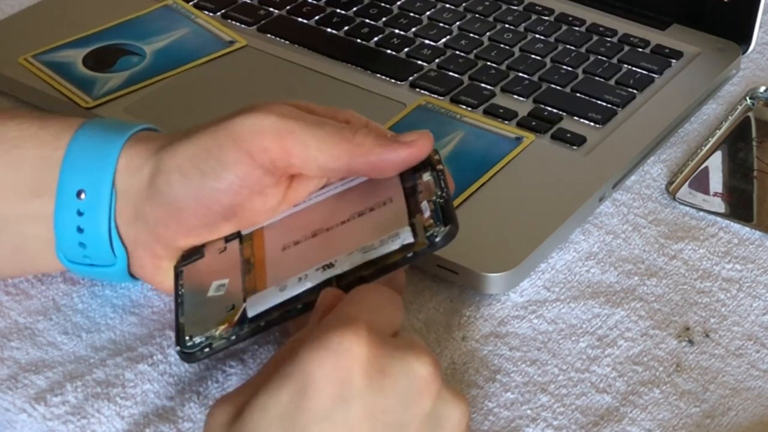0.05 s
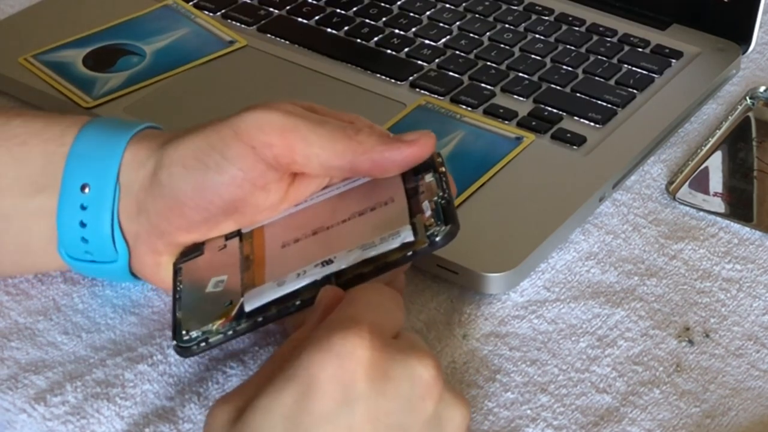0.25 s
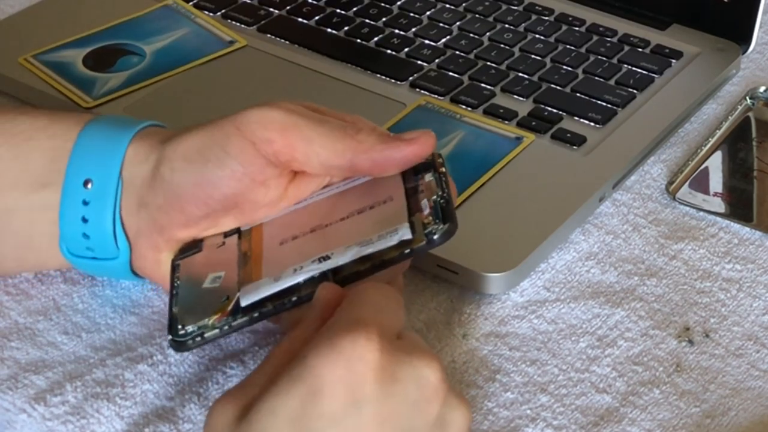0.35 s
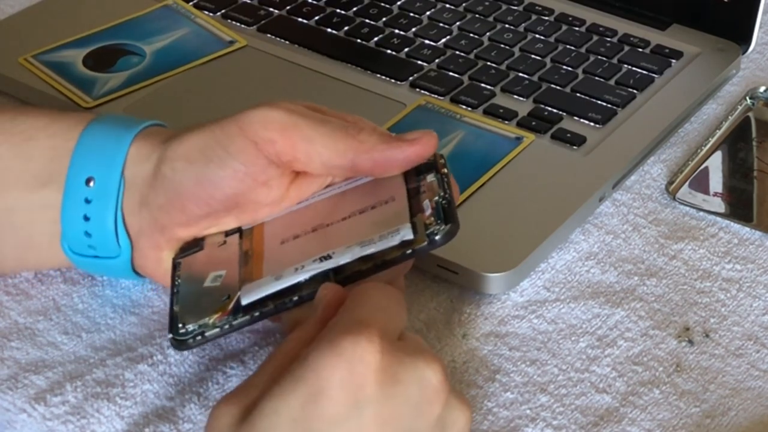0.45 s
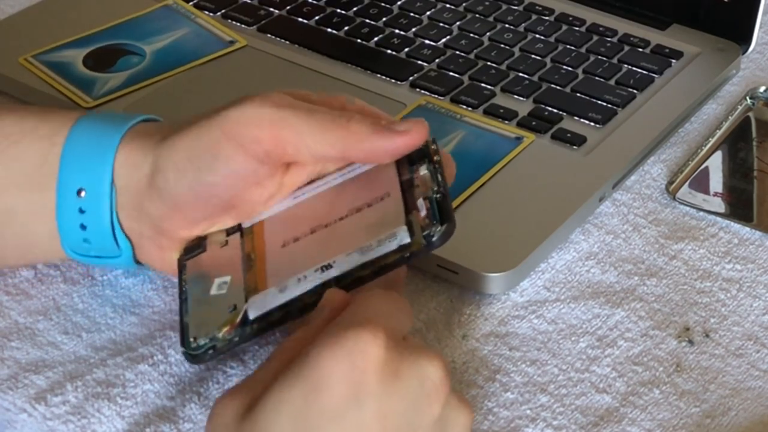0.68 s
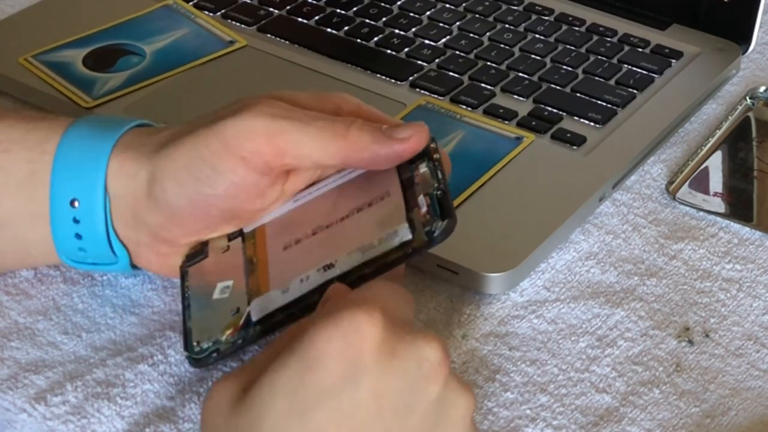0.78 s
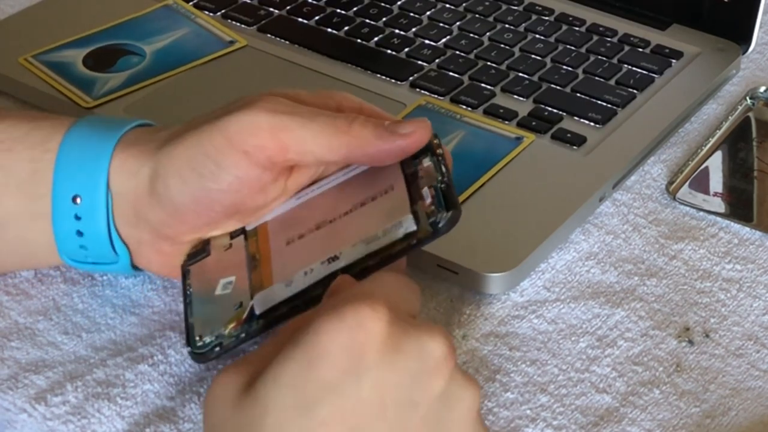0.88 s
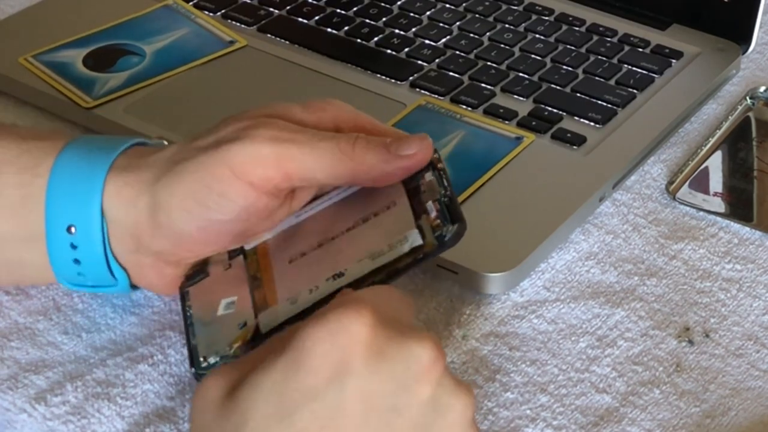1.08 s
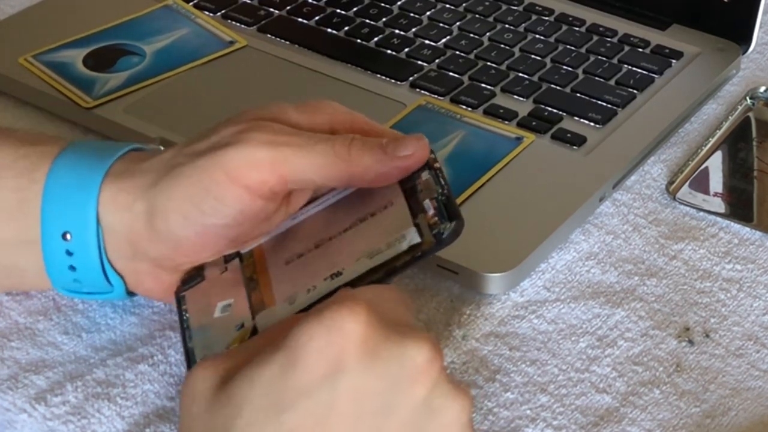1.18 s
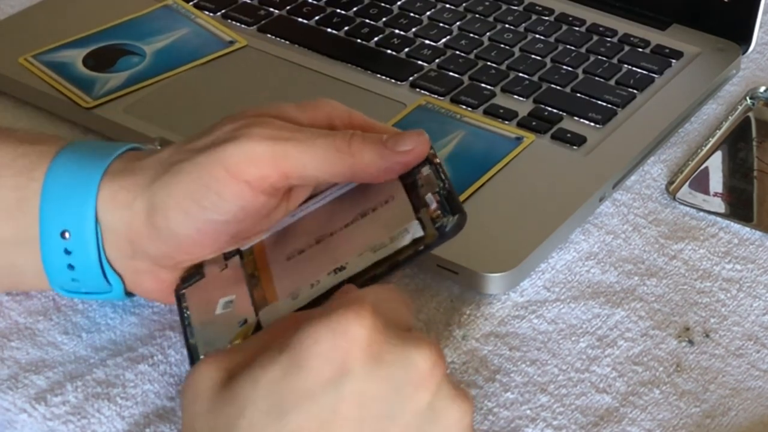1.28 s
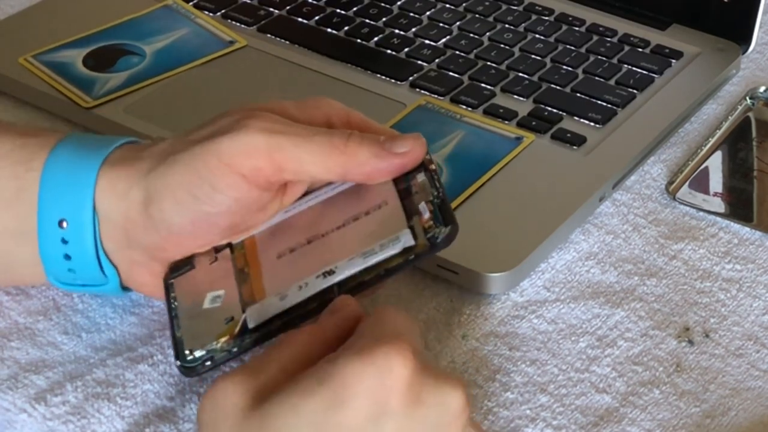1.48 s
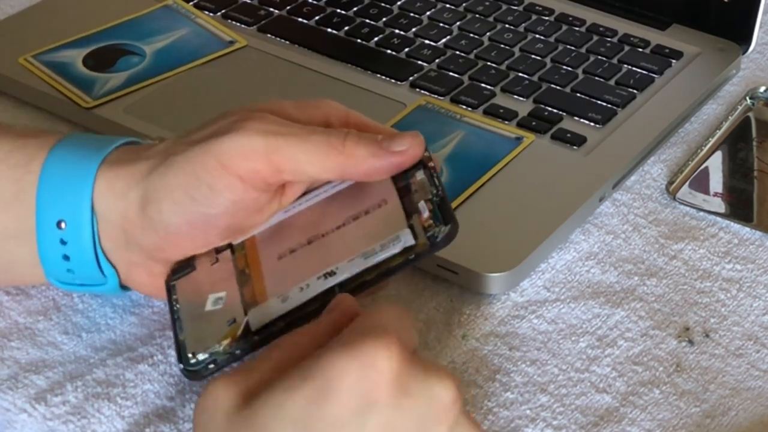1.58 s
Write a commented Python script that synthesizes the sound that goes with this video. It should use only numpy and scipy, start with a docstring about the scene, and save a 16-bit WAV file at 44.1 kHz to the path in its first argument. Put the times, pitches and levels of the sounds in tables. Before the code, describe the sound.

Sharp plastic cracks from an opened phone-like device, then faint ticks and soft rubbing indoors

```python
"""Prying open a small device

Fingers pry at a small open electronic device on a towel in a quiet room. Adhesive and clips let go in two
loud snaps and some faint ticks: bright bursts with a noisy shiver that set damped case modes ringing.
Sparse, decaying reflections answer as the room. Shaped noise makes the rubbing of skin and cloth and the
steady hiss; wavering sine lines make the mains hum.
"""
import sys
import numpy as np
from scipy import signal
from scipy.fft import rfft, irfft
from scipy.io import wavfile
from scipy.ndimage import uniform_filter1d

SR = 44100
rng = np.random.default_rng(int(sys.argv[2]) if len(sys.argv) > 2 else 0)


def invert_db(x):
    """Field ratio 10**(x/20) for x, a level in decibels (scalar or array-like)."""
    u = np.asarray(x, float) / 20
    return 10 ** u


def int16_out(signal):
    """Quantize to a 16-bit WAV file."""
    q = np.round(np.clip(np.atleast_2d(signal).T, -1, 1) * 32767)
    wavfile.write(sys.argv[1], SR, q.astype(np.int16))


N = 72765  # samples, 1.65 s


def evened(x):
    """Scales a signal to an rms of one."""
    return x / np.sqrt(np.mean(x ** 2) + 1e-20)


def read(points, hz):
    """Reads a (frequency, value) curve along a logarithmic frequency axis."""
    f, value = np.transpose(points)
    return np.interp(np.log(hz + 1), np.log(f + 1), value)


def add(mix, start_s, sound):
    """Lays a sound into the mix in place, cut off at the end of the mix."""
    part = mix[round(start_s * SR):][:len(sound)]
    part += sound[:len(part)]


def noise(tone, patchy_db, size):
    """Noise of a given colour from random short-time spectra whose level drifts in patches; rms one."""
    frames = 4 * N // size + 5
    hz = np.fft.rfftfreq(size, 1 / SR)
    real, imag, patches = rng.standard_normal((3, len(hz), frames))
    patches = uniform_filter1d(patches, size=12, axis=0)  # smooth across frequency
    patches = evened(uniform_filter1d(patches, size=10, axis=1))  # and across time
    level_db = read(tone, hz)[:, None] + patchy_db * patches
    spectra = (real + 1j * imag) * invert_db(level_db)
    sound = signal.istft(spectra, nperseg=size, noverlap=3 * size // 4)[1]
    return evened(sound[:N])


def hiss():
    """Steady background air: coloured noise, strongest in the lows, with a long faint treble."""
    # colour of the background: (frequency [Hz], relative level [dB])
    air_tone = [(12, -43.5), (30, -25.5), (50, -6.5), (70, -2), (100, -6.5), (169, -11.5), (260, -11),
                (330, -12), (709, -20.5), (1390, -26), (5000, -31.5), (11500, -34.5), (15700, -33),
                (16000, -55.5)]
    return invert_db(-67) * noise(air_tone, patchy_db=1.52, size=4096)


def slow_waver(t):
    """Slow random drift: sines from 0.5 to 9 Hz at random phases, weaker as they get faster; rms one."""
    rates_hz = np.geomspace(.5, 9, num=20)
    return evened(sum(np.sin(2 * np.pi * (f * t + rng.random())) / np.sqrt(f) for f in rates_hz))


def hum():
    """Mains lines: sines whose level and phase waver."""
    # hum lines: (frequency [Hz], level before the waver [dB rms])
    lines = [(59.2, -70), (118.4, -67.5), (242.2, -79), (274.5, -82)]
    level_waver_db, phase_waver_rad = 0.5, .4  # rms
    t = np.arange(N) / SR
    out = np.zeros(N)
    for hz, db in lines:
        level = np.sqrt(2) * invert_db(db + level_waver_db * slow_waver(t))
        phase = 2 * np.pi * (hz * t + rng.random()) + phase_waver_rad * slow_waver(t)
        out += level * np.sin(phase)
    return out


def room(x):
    """Sparse reflections after the first wall, each band dying at its own speed."""
    # decay of the room: (frequency [Hz], time to fall 60 dB [s])
    decay = [(500, 0.46), (1400, .36), (3500, .35), (9000, .32), (15000, .24)]
    # colour of the reflections: (frequency [Hz], relative level [dB])
    room_tone = [(500, 1.5), (1400, 1.4), (2500, 3), (3800, -2), (5500, 2.5), (9000, -2.1), (15000, -2)]
    room_db, wall_s, build_s = -11, 0.0053, .002  # level, delay of the first wall, build-up time
    taps = np.zeros(SR // 2)
    slots = np.arange(0, len(taps) - 12, 12)
    # one reflection of random sign somewhere in every 12 samples
    taps[slots + rng.integers(0, 12, len(slots))] = rng.choice([-1., 1.], len(slots))
    hz, t, spectra = signal.stft(taps, SR, nperseg=256)
    level_db = read(room_tone, hz)[:, None] - 60 * t / read(decay, hz)[:, None]
    tail = signal.istft(spectra * invert_db(level_db), SR, nperseg=256)[1]
    after_wall_s = np.maximum(np.arange(len(tail)) / SR - wall_s, 0)
    tail = tail * (1 - np.exp(-after_wall_s / build_s))
    return invert_db(room_db) * signal.fftconvolve(x, tail / np.linalg.norm(tail))[:N]


def rubbing():
    """Skin and cloth rubbing: soft friction noise that follows the hands."""
    # strength of the rubbing: (time [s], level [dB])
    strokes = [(0, -97), (.1, -85), (.19, -71), (.4, -97), (0.432, -63.5), (.66, -72.5), (0.719, -70.5),
               (.76, -68.5), (.79, -69.5), (.82, -93.5), (1.04, -92), (1.08, -76), (1.149, -92),
               (1.27, -74), (1.35, -91), (1.541, -86.5), (1.579, -72.5), (1.65, -80.5)]
    # colour of the friction: (frequency [Hz], relative level [dB])
    rub_tone = [(350, -31), (800, -11), (1570, -2.5), (3000, -6.5), (5070, -5.5), (8160, -12.5),
                (15500, -15.5), (16000, -35)]
    s, db = np.transpose(strokes)
    envelope = invert_db(np.interp(np.arange(N) / SR, s, db))
    return envelope * noise(rub_tone, patchy_db=2.0, size=256)


def ring(modes, rise_s, t):
    """Heavily damped modes with a soft start."""
    soft_start = (1 - np.exp(-t / rise_s)) ** 2
    return soft_start * sum(invert_db(db - 60 * t / t60) * np.sin(2 * np.pi * hz * t) for hz, db, t60 in modes)


def crack(centre_hz, grit):
    """A part letting go: a burst of a few bright cycles, then a noisy shiver around the same pitch."""
    half_s = .85 / centre_hz  # half-length of the burst: 0.85 cycles
    shiver_db, shiver_t60_s, shiver_spread = -21, 0.02, .55  # spread as a share of the centre
    t = np.arange(len(grit)) / SR
    burst = np.exp(-(t / half_s - 2) ** 2) * np.cos(2 * np.pi * centre_hz * (t - 2 * half_s))
    hz = np.fft.rfftfreq(len(grit), 1 / SR)
    band = np.exp(-((hz / centre_hz - 1) / shiver_spread) ** 2)
    shiver = evened(irfft(rfft(grit) * band, len(grit)))
    shiver_level = invert_db(shiver_db - 60 * t / shiver_t60_s) * (1 - np.exp(-t / half_s))
    return burst + shiver * shiver_level


def click(crack_db, crack_hz, hollow_db, panel_db, grit):
    """One release: the crack sets the hollow case and its thin panel ringing."""
    # modes of the hollow case: (frequency [Hz], relative level [dB], time to fall 60 dB [s])
    hollow_modes = [(500, -22.5, 0.0074), (941, -12, .007), (1350, -5.5, 0.0079), (1696, -7, 0.0073),
                    (2500, -14, .005)]
    # modes of the thin panel: (frequency [Hz], relative level [dB], time to fall 60 dB [s])
    panel_modes = [(3907, -2, .0032), (5200, -7.5, 0.0033)]
    hollow_rise_s, panel_rise_s = .001, .0003
    echo_s, echo_db = .0105, -8.5  # a wall returns the hollow knock
    t = np.arange(len(grit)) / SR
    knock = ring(hollow_modes, hollow_rise_s, t)
    echo = invert_db(echo_db) * ring(hollow_modes, hollow_rise_s, np.maximum(t - echo_s, 0))
    panel = ring(panel_modes, panel_rise_s, t)
    return invert_db(crack_db) * crack(crack_hz, grit) + invert_db(hollow_db) * (knock + echo) + invert_db(panel_db) * panel


def device():
    """Adhesive and clips letting go in a room; clicks take turns among three random reverb tails."""
    # every release: (time [s], crack burst [dB], crack centre [Hz], hollow knock [dB], thin panel [dB])
    releases = [(0.1228, -40.5, 9800, -35.5, -35.5), (.144, -61.5, 12000, -77, -65),
                (0.174, -48, 11900, -68, -70), (0.1848, -46, 10100, -77.5, -61),
                (0.1886, -43, 11000, -75, -57), (0.2022, -53, 12990, -65.5, -74),
                (.2072, -17, 12990, -8, -12), (.209, -2.5, 10310, -4.5, -2.5),
                (0.2113, -5, 12000, -3.5, -6.5), (0.2127, -1.5, 13100, -15.5, -20),
                (.416, -50, 10750, -91, -99), (0.4353, -42, 11100, -72, -85), (.4388, -48, 11500, -76, -75),
                (.4465, -38, 10500, -64, -75), (.458, 0.3, 11500, -12.5, -4), (.484, -4, 9360, -17, -14),
                (0.4853, -12, 12900, -23, -23), (0.7485, -55, 6000, -50, -60),
                (.7521, -41, 12800, -65.5, -69), (0.763, -60, 13000, -77, -76),
                (0.7997, -38, 12000, -78, -73), (.8947, -47, 10480, -79.5, -80.5),
                (1.022, -60, 9000, -79, -80), (1.033, -58, 9400, -78, -79), (1.355, -59, 15000, -81, -80.5),
                (1.4337, -45, 6800, -80.5, -72), (1.578, -58, 6500, -63, -67.5)]
    tails = np.zeros((3, N))  # the clicks that feed each tail
    grits = rng.standard_normal((len(releases), 2048))
    for k, ((start_s, *settings), grit) in enumerate(zip(releases, grits)):
        add(tails[k % len(tails)], start_s, click(*settings, grit))
    return sum(x + room(x) for x in tails)


def scene():
    """Sums the device in its room, the rubbing, the hum and the hiss into one channel."""
    return (device() + rubbing() + hum() + hiss())[None]


def roll_off(x):
    """The treble ends steeply here."""
    return signal.sosfilt(signal.butter(12, 17150, fs=SR, output="sos"), x)


def record(dry):
    """Microphone: the treble rolls off and then stops at a band limit."""
    roll_hz, edge_hz, edge_db = 14500, 16100, -8  # roll-off start, band edge, level at the edge
    corners_hz = [0, roll_hz, edge_hz, edge_hz + 900, SR / 2]
    mic = signal.firwin2(127, corners_hz, [1, 1, invert_db(edge_db), 0, 0], fs=SR)
    mix = signal.oaconvolve(dry, mic[None], "same")
    return roll_off(mix)


dry = scene()
out = record(dry)
int16_out(out)
```